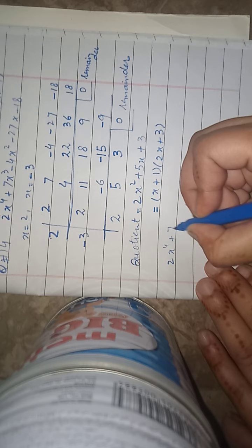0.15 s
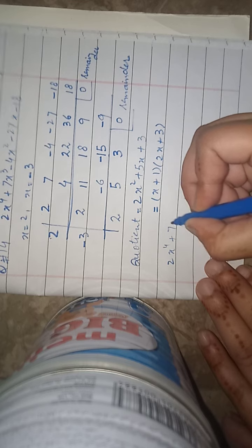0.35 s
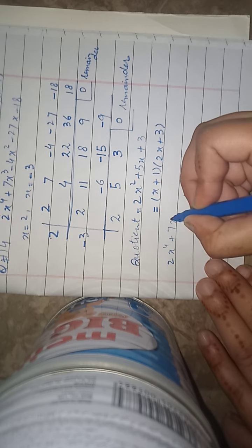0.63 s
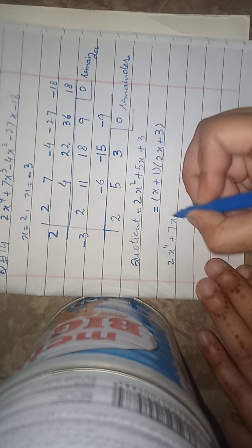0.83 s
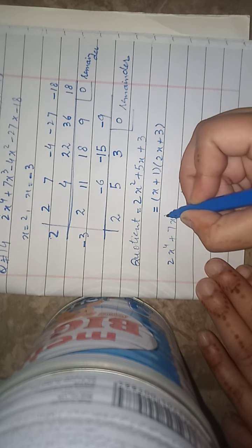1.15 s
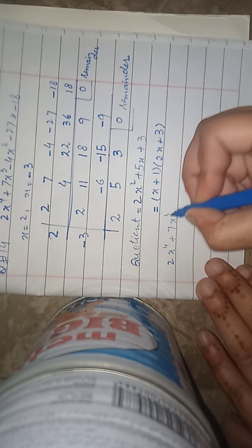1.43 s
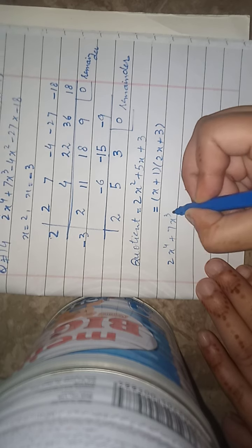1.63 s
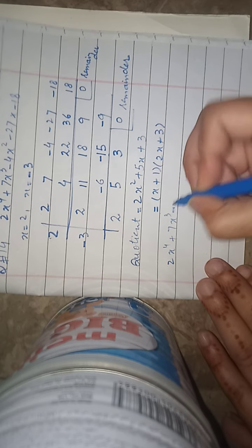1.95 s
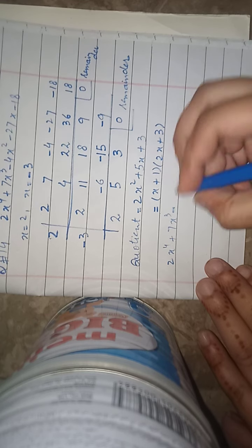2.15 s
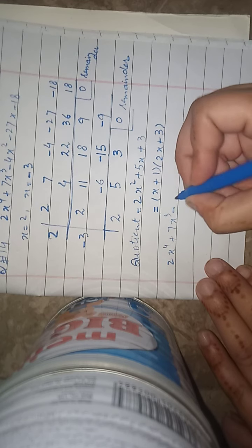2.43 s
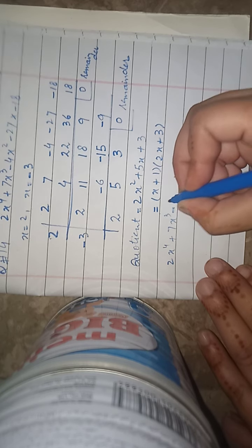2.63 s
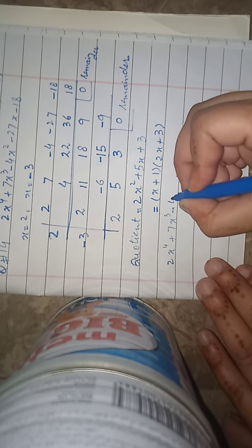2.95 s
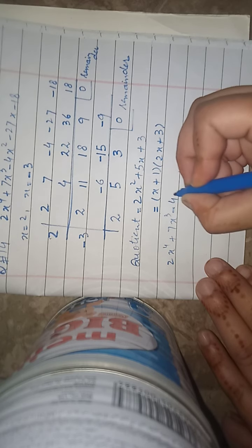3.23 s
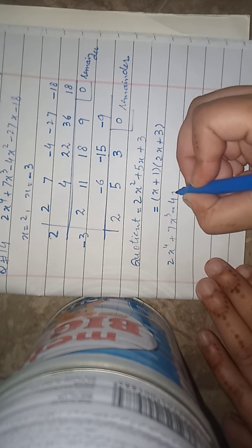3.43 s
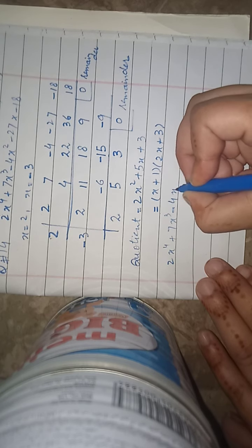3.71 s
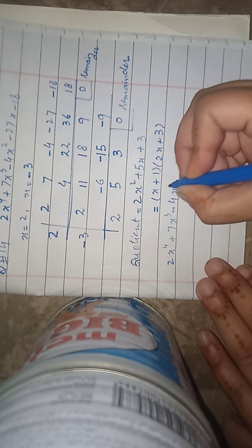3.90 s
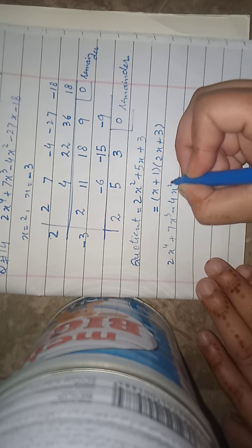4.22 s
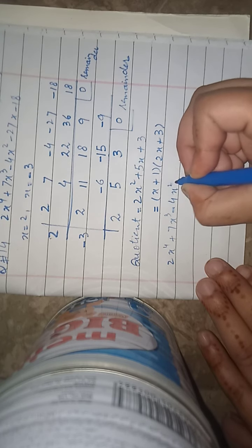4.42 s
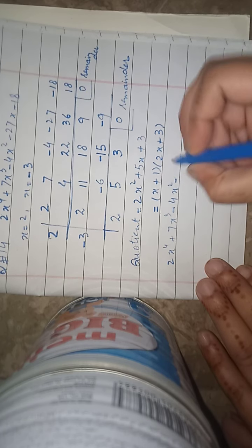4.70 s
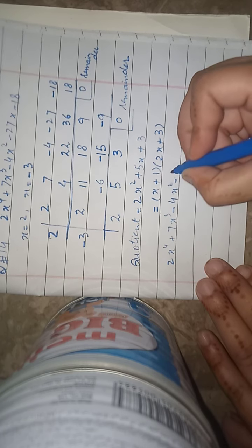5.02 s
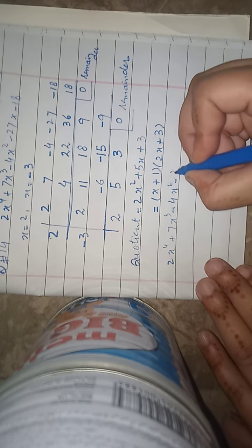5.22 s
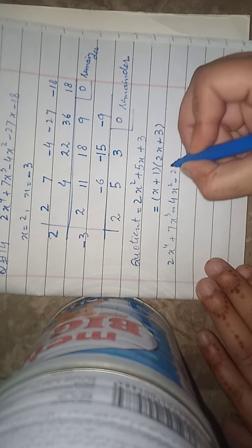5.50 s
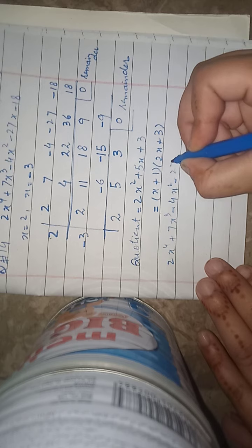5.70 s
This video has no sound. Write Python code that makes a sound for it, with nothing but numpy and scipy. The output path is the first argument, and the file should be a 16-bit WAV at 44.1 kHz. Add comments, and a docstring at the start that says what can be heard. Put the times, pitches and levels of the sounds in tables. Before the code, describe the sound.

An electric fan runs steadily in a quiet room, a low throbbing hum beneath a soft, even rush of air.

```python
"""A quiet room where a six-bladed electric fan runs steadily, heard by a small phone microphone.
The blades throb at multiples of the shaft speed, which creeps up very slightly.
The motor hums at twice the mains, with fainter hums beside it; all are wavering sine tones.
Chopped eddies add fuzzy bands of noise round the blade tones, and the rush of air
spreads an even hiss of filtered noise that the room colours in the bass."""
import sys
import numpy as np
from scipy import signal
from scipy.fft import rfft, irfft, next_fast_len
from scipy.io import wavfile

SR = 44100
rng = np.random.default_rng(int(sys.argv[2]) if len(sys.argv) > 2 else 0)


def natural_amplitude(level_db):
    """Convert a level in decibels to a linear amplitude factor, elementwise."""
    exponent = np.asarray(level_db, float) / 20
    return 10 ** exponent


def wav_record(signal):
    """Record a signal, one row per channel, as 16-bit PCM in the file named by sys.argv[1]."""
    frames = np.transpose(np.atleast_2d(signal))
    bounded = np.clip(frames, -1, 1)
    # unit amplitude maps onto the largest positive 16-bit level
    quanta = np.round(bounded * 32767).astype(np.int16)
    wavfile.write(sys.argv[1], SR, quanta)


N = 258205  # length in samples

# How fast the shaft turns. Each row: time in seconds, speed in turns per second.
SHAFT_SPEED = [(0, 21.962), (5.86, 22.0)]


def evened(x):
    """Scales a signal to an rms (average strength) of 1."""
    return x / np.sqrt(np.mean(x ** 2))


def drift(top_hz):
    """Slow random wander of rms 1: sines from 0.2 Hz to top_hz, the slowest ones strongest."""
    t = np.arange(0, N + 256, 256) / SR
    wander = 0
    for rate_hz in np.geomspace(0.2, top_hz, num=20):
        wander = wander + np.sin(2 * np.pi * (rate_hz * t + rng.random())) / np.sqrt(rate_hz)
    return np.interp(np.arange(N) / SR, t, evened(wander))


def shaped_noise(gain):
    """Noise of rms 1: each frequency of plain white noise is scaled by gain(hz)."""
    size = next_fast_len(N)
    hz = np.fft.rfftfreq(size, 1 / SR)
    spectrum = rfft(rng.standard_normal(size)) * gain(hz)
    return evened(irfft(spectrum, size)[:N])


def blades():
    """Lopsided pressure pulses, one blade the loudest: tones in step with the shaft, throbbing once a turn."""
    # Tones locked to the shaft; multiples of six are the blades passing.
    # Each row: multiple of the shaft speed, rms level in dB.
    shaft_tones = [(3, -53), (4, -53), (5, -45), (6, -31), (7, -43), (10, -52), (12, -42), (13, -54),
                   (14, -53), (17, -51), (18, -38), (19, -57), (24, -47), (30, -51)]
    turns_per_s = np.interp(np.arange(N) / SR, *np.transpose(SHAFT_SPEED))
    angle = 2 * np.pi * np.cumsum(turns_per_s) / SR
    lag = 0.7  # radians, the same for every tone
    total = 0
    for multiple, db in shaft_tones:
        level = np.sqrt(2) * natural_amplitude(db + 1.0 * drift(top_hz=3))  # sqrt(2) turns rms into sine height
        total = total + level * np.cos(multiple * angle - lag)
    return total


def motor():
    """Hums not locked to the shaft: steady sines that waver a little in level."""
    # Twice the mains first, then fainter hums. Each row: frequency in Hz, rms level in dB.
    hum_tones = [(100.45, -45), (112.27, -49), (72.5, -60), (297.7, -51), (31.9, -72)]
    t = np.arange(N) / SR
    total = 0
    for hz, db in hum_tones:
        level = np.sqrt(2) * natural_amplitude(db + 0.75 * drift(top_hz=7.2))
        total = total + level * np.sin(2 * np.pi * (hz * t + rng.random()))
    return total


def eddies():
    """Eddies chopped by the blades: a fuzzy noise band round each blade tone, fainter with each step up."""
    blade_count, band_count = 6, 5
    first_db, step_db = -40.5, -2.5  # rms level of the lowest band, change per band
    width_hz = 15  # between the points about 7 dB below the peak
    blade_hz = blade_count * np.mean(SHAFT_SPEED, axis=0)[1]
    total = 0
    for band in range(band_count):
        centre_hz = (band + 1) * blade_hz

        def gain(hz):
            return 1 / (1 + (2 * (hz - centre_hz) / width_hz) ** 2) ** 1.22
        total = total + natural_amplitude(first_db + step_db * band) * shaped_noise(gain)
    return total


def rush():
    """Rush of air: broad hiss shaped by the room's peaks and nulls, swelling very slightly."""
    # Air noise through the microphone; only the shape counts, as the noise is scaled to rms 1.
    # Each row: frequency in Hz, relative level in dB.
    air_shape = [(20, -27.5), (53, -26.5), (66, -12), (110, -4), (260, -1), (600, -5.5), (1000, -6),
                 (2200, -14.5), (3800, -18), (4601, -29), (5701, -43.5), (6601, -40), (7500, -47),
                 (8300, -48.5), (9100, -55.5), (9800, -63.5), (12500, -70), (16000, -68.5)]
    # Standing waves of the room: peaks and nulls at the microphone.
    # Each row: centre in Hz, distance in Hz at which the dB shrink to about a third, peak or null in dB.
    standing_waves = [(32, 3.4, 6), (81, 5, -2), (145.6, 5, -12.5), (150.9, 10, 8), (166, 13, 3),
                      (207.4, 9.4, -8), (217.6, 6.4, 2), (242.5, 12, 3), (315, 11, 3), (353, 20, -2),
                      (496, 20, -3.5), (595, 27, -1.5)]
    rush_db, ripple_db = -30, 1.0  # rms level of the hiss; rms depth of the fine ripple at 1 kHz

    def gain(hz):
        air_hz, air_db = np.transpose(air_shape)
        room_db = sum(db * np.exp(-((hz - centre) / width) ** 2) for centre, width, db in standing_waves)
        # higher up the standing waves crowd into a fine random ripple, smoothed over about 26 Hz
        ripple = evened(signal.oaconvolve(rng.standard_normal(len(hz)), np.hanning(150), "same"))
        # the ripple starts at 700 Hz and evens out towards the treble
        room_db += ripple_db * ripple * (hz > 700) * 1000 / (hz + 1)
        hiss_db = np.interp(np.log(hz + 1), np.log(air_hz + 1), air_db)
        return natural_amplitude(hiss_db + room_db)

    swell = natural_amplitude(rush_db + 0.51 * drift(top_hz=4))
    return swell * shaped_noise(gain)


def scene():
    """Adds all the layers on one channel."""
    mix = blades() + motor() + eddies() + rush()
    return mix[None]


def low_pass(x):
    """Removes everything above the highest recorded frequency."""
    return signal.sosfilt(signal.butter(12, 15510, fs=SR, output="sos"), x)


def record(dry):
    """Turns the finished mix into the sound that is saved."""
    return low_pass(dry)


dry = scene()
out = record(dry)
wav_record(out)
```